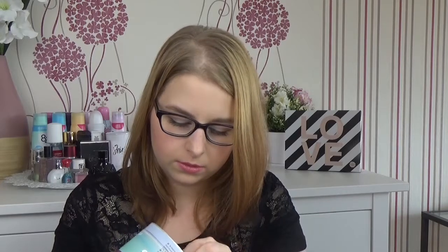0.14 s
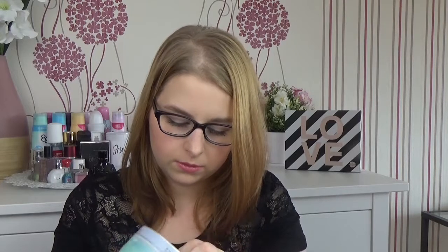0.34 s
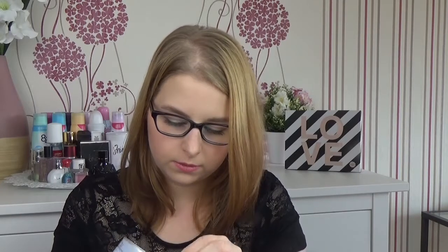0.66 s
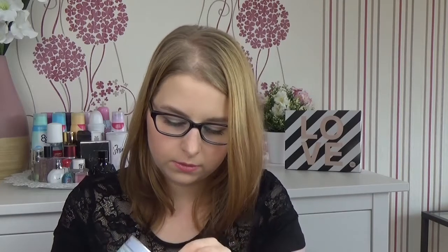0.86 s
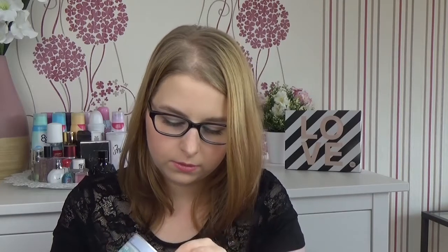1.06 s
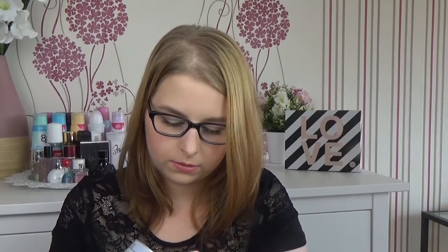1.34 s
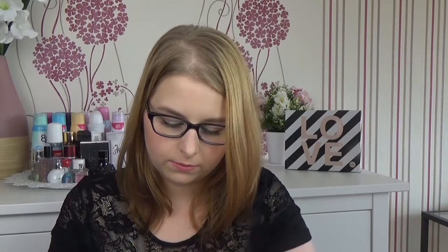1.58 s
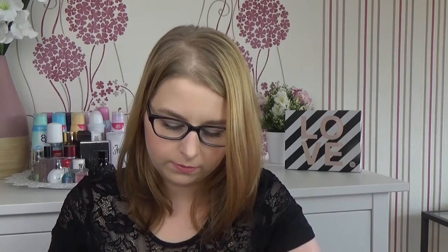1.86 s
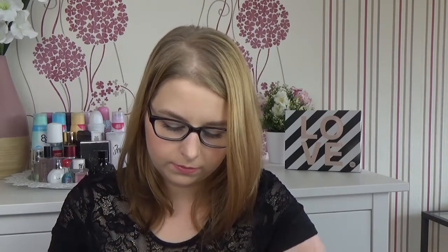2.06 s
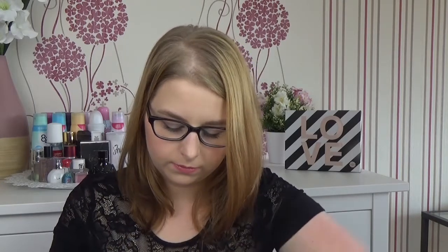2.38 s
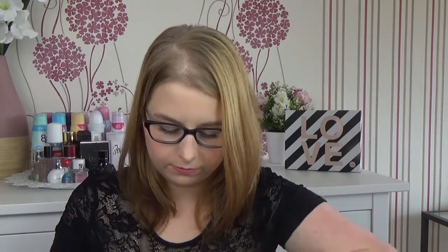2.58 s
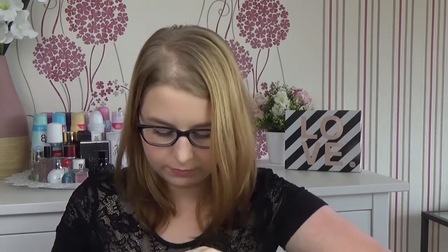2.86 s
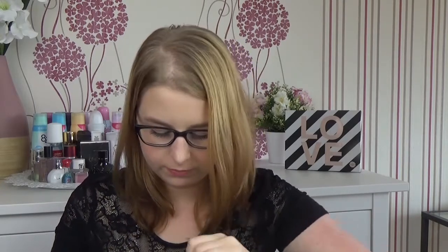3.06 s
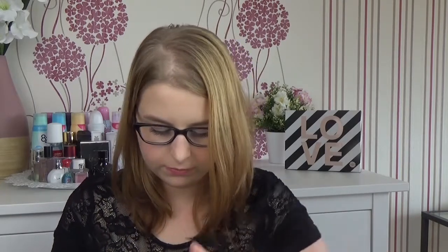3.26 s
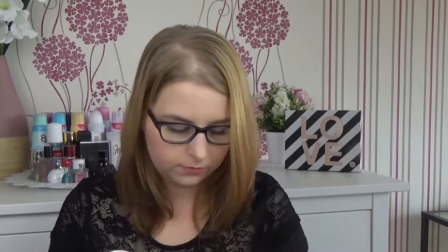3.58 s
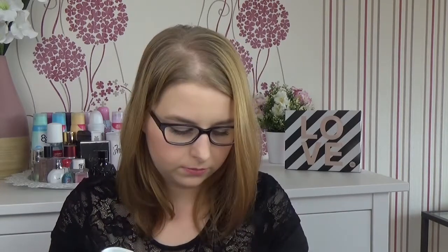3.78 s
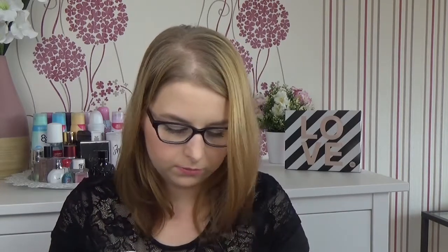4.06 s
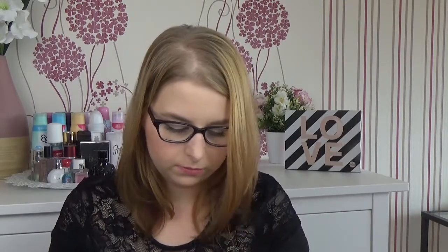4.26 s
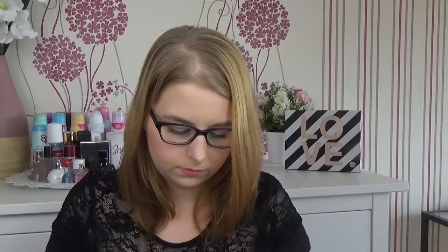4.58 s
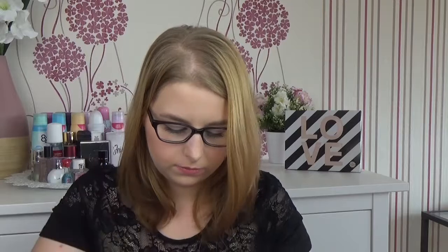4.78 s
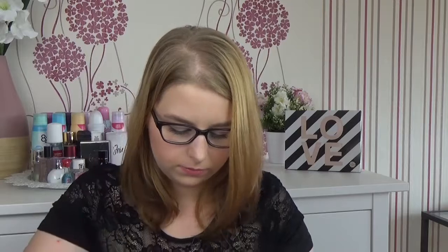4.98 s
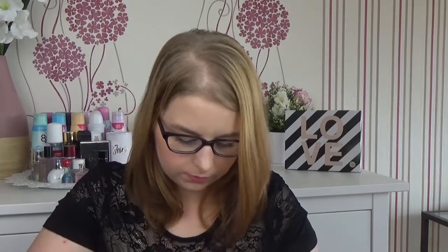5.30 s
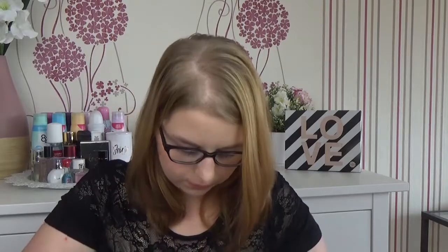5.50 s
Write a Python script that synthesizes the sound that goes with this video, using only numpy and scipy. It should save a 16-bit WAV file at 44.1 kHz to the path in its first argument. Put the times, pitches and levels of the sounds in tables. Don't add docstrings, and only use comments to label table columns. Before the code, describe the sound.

Hands handle a hollow cardboard can: a burst of loud clicks with a brief tearing scrape, a lull with faint finger rubs, scattered knocks, then a harder cluster of snaps and ripping. Another lull leads to light foil crackle, crisp rustling and last pops. Short room reverberation, soft air noise and low rumble, nearby stereo camera microphone.

```python
import sys
import numpy as np
from scipy import signal
from scipy.fft import rfft, irfft, next_fast_len
from scipy.io import wavfile

SR = 44100
rng = np.random.default_rng(int(sys.argv[2]) if len(sys.argv) > 2 else 0)


def attenuation_scalar(level_db):
    decades = np.asarray(level_db, float) / 20
    return 10 ** decades


def master_out(mix):
    frames = np.transpose(np.atleast_2d(mix))
    ceiling = np.clip(frames, -1, 1)
    pcm = np.round(ceiling * 32767).astype(np.int16)
    wavfile.write(sys.argv[1], SR, pcm)


N = 248283

# frequency_hz, density_db
AIR_SPECTRUM = [(15, -74), (25, -20.5), (185, -6), (695, -4), (887, -4.5), (1070, -4), (2910, -9.5),
                (16000, -16.5)]
# frequency_hz, side_minus_mid_db
AIR_SPREAD = [(60, -4), (200, -13), (380, -1.5), (700, -1.5), (1290, -0.5), (4400, -4.5), (8120, -9),
              (15000, -12)]
AIR_DB = -59
HUM_HZ, HUM_DB = 899, -76
RUMBLE_DB, BOOM_DB, BOOM_LAG_S = -76, -37.5, 0.031

# centre_hz, width_hz, level_db (over the plain sound)
TUBE_MODES = [
    [(506, 70, 7), (830, 67, -0.5), (1496, 140, 12), (1973, 100, 6.5), (2873, 300, 5.5), (3330, 220, 3),
     (4500, 930, 2.5)],
    [(530, 98, -6), (820, 29, -25.5), (950, 106, -3), (1280, 90, 4.5), (1530, 110, 2), (1990, 103, -17),
     (3340, 440, -9)],
    [(402, 103, 7), (607, 134, 8), (945, 136, 14.5), (1730, 180, -4.5), (2450, 230, -5), (2850, 190, -0.5),
     (3340, 87, -4)],
]
TUBE_CHANGES = [1.5, 4.82]

# start_s, energy_db, thud_db (re energy), thud_hz, ring_hz
BRIGHT_KNOCKS = [(0.001, -13.5, -2, 916, 1710), (0.08, -16.5, -3, 890, 1570),
                 (0.3071, -9.5, -3.5, 840, 4160), (0.384, -7, -1, 870, 3100), (0.3947, -3.5, -6, 941, 3220),
                 (0.4058, 2.5, 0.5, 534, 1990), (1.446, -25, -5, 765, 2020), (1.5811, 0.5, -9, 950, 1424),
                 (1.5939, -11.5, 2.5, 766, 1560), (1.7501, 0.5, 1, 666, 2370), (1.9183, -1, -27, 600, 1290),
                 (2.5213, -12, -2.5, 880, 3340), (2.5965, 7, -13, 900, 1670),
                 (2.7643, 6.5, -10.5, 750, 1280), (3.0211, -19, 5, 580, 3760),
                 (4.8957, -10.5, 3.5, 1050, 3580), (4.9119, -21, 8, 600, 3360),
                 (4.942, -13, -18, 920, 1820), (5.1391, -1.5, -8, 950, 2450)]
# start_s, energy_db, thud_db (re energy), thud_hz, ring_hz
DULL_KNOCKS = [(0.2485, -37, 7, 850, 1530), (1.0423, -36, 4, 553, 1550), (1.4171, -33.5, -15, 880, 2000),
               (1.6017, -8.5, -1, 830, 3630), (1.6843, -11.5, 1, 690, 1450), (1.892, -31, 14, 700, 1210),
               (1.907, -21, 15.5, 470, 2540), (1.9146, -3, 0, 560, 1940), (2.1944, -31.5, 2, 520, 1670),
               (2.4257, -3, -4, 1000, 1865), (2.5912, -8.5, -1, 844, 1940), (3.126, -27, -13, 550, 1350),
               (3.5246, -35, -1, 600, 1290), (4.8942, -21, 10, 686, 3540), (4.9035, 3.5, -10, 663, 3730),
               (4.969, -4.5, -6, 724, 1800), (5.4535, -15.5, -14, 480, 2340), (5.5039, 4.5, -15, 950, 1637),
               (5.5902, -10.5, -30, 960, 1390)]
BRIGHT_CRISP_DB, DULL_CRISP_DB = -7.5, -26.5
# start_s, energy_db, crisp_db (re energy), ring_hz
SEAL_CRACKS = [(0.089, -25, -6.5, 1570), (0.0979, -36, 10, 1400), (0.3369, -9, -0.5, 2030),
               (0.6665, -26, -5, 1510), (0.8845, -37, 0.5, 3260), (1.2254, -32.5, -10, 3220),
               (1.2989, -39, 3.5, 2080), (1.335, -37, -1, 1564), (1.6927, -30.5, 11, 2950),
               (1.7128, -5, -2, 2880), (1.8333, -16.5, 5, 2840), (2.2745, -28, -5, 1280),
               (2.373, -31.5, -2.5, 2750), (2.4896, -16, -6, 2060), (2.4947, -23.5, 0.5, 2240),
               (2.5328, -4.5, -12, 2040), (2.6234, -5, -1.5, 1630), (2.6636, 3, -10.5, 3070),
               (2.7086, 1.5, -19, 2360), (2.7421, -17, 8, 1870), (3.2766, -42, 3, 4530),
               (3.3769, -38, 2.5, 4500)]
# start_s, energy_db, crisp_db (re energy), ring_hz
FOIL_CRACKS = [(4.3802, -20.5, -15, 1900), (4.397, -48, 8, 1970), (4.4084, -16.5, -12, 1930),
               (4.4514, -26, -8, 3600), (4.474, -42, 9, 3180), (4.4812, -18, -17, 3130),
               (4.4963, -18.5, 3, 3200), (4.5006, -23, -22, 3230), (4.5186, -16.5, -21, 3750),
               (4.5328, -28, 8, 3570), (4.5579, -19, -12, 3870), (4.4215, -36, -12, 1880),
               (4.6086, -15, -10.5, 3200), (4.6293, -21, -22, 3140), (4.7639, -31, -8, 4070),
               (4.8088, -29, -6, 2740), (4.8323, -29, 11, 2580), (4.8399, -16, -2.5, 4370),
               (4.8508, -24.5, 10, 2800), (4.8629, -23, -12, 3890), (5.0491, -16.5, -5, 1990),
               (5.069, -12, -4.5, 4270), (5.1333, -7, -11.5, 4700), (5.1425, -9, -22, 3540)]
SEAL_THUD_DB, FOIL_THUD_DB, CRACK_THUD_HZ = -22.5, -22, 850

# centre_hz, t60_s, level_db, side_minus_mid_db
ROOM_BANDS = [(130, 0.24, -4, -5), (264, 0.27, 5, -14.5), (480, 0.44, -0.5, -13.5), (1040, 0.38, 1.5, -10),
              (2650, 0.47, -1, -8), (5600, .4, -1.5, -7.5), (12000, 0.26, -4, -11.5)]
# delay_ms, level_db, left_minus_right_db
ECHOES = [(2.6, -9.5, 9.5), (7.0, -13.5, -5.5), (12.5, -18.5, 6)]

# start_s, length_s, rasp_db, hollow_db (re rasp), crisp_db (re rasp)
RIPS = [
    [(0.407, .14, -19.5, 4.5, -8.5), (0.52, 0.091, -34.5, 4, -2.5)],
    [(2.766, 0.048, -17, -30.5, -3.5), (2.78, 0.18, -22, 2, 2), (2.825, 0.1, -25.5, 4.5, -16.5),
     (3.005, 0.083, -38.5, 2.5, -5.5)],
]
# start_s, length_s, rasp_db, hollow_db (re rasp), crisp_db (re rasp)
RUBS = [
    [(1.04, 0.25, -52.5, -1, -4), (1.41, .07, -57, 2, 5), (1.49, 0.2, -56.5, -1, 4)],
    [(2.1, .25, -53.5, -3, -4), (2.33, .055, -43.5, -28, 0.5), (2.36, 0.043, -51.5, 10.5, 5.5),
     (2.39, .045, -41, -8, 2)],
    [(3.25, 0.074, -56, -5, 6), (3.3, 0.091, -54.5, -3, -8), (3.36, 0.077, -50, -12, 2.5),
     (3.48, 0.12, -61.5, 8.5, -5)],
    [(4.229, 0.03, -35.5, -8.5, 1), (4.26, 0.13, -44.5, -24, 3.5)],
    [(4.318, 0.049, -41.5, -4.5, 8), (4.33, 0.2, -40.5, -18.5, 5.5), (4.448, 0.024, -29, -30, -15)],
    [(5.15, .25, -38, -13, 8.4), (5.4, 0.059, -41.5, -28, 2.3)],
]
# start_s, length_s, rasp_db, hollow_db (re rasp), crisp_db (re rasp)
CRINKLES = [
    [(4.47, 0.25, -48, -11, -19)],
    [(4.83, 0.32, -40.5, -22, -3), (4.9, 0.13, -36, -4.5, -9), (4.99, 0.3, -48.5, -19, -7)],
    [(5.44, 0.078, -42, -14, -5), (5.5, .125, -29, -15, -28)],
]
# hollow_hz, hollow_width_hz, rasp_hz, rasp_width_hz, crisp_hz
RIP_COLOUR = [(537, 460, 1650, 2800, 7400), (560, 258, 1800, 4000, 10300)]
RUB_COLOUR = [(797, 440, 2500, 2900, 9800), (600, 420, 2800, 3800, 9900), (600, 1100, 3400, 6400, 10800),
              (500, 36, 3500, 11000, 10800), (505, 190, 3560, 5300, 10600), (950, 850, 5340, 5300, 11160)]
CRINKLE_COLOUR = [(690, 630, 5800, 2800, 7900), (676, 980, 2070, 2500, 9700), (664, 620, 1570, 2900, 9100)]
# peak_share (of length), end_loss_db, crisp_db_per_db, release_abruptness (exponent)
RIP_PULL = (0.02, 20.6, 1.7, 1.49)
RUB_PULL = (0.49, 10, 2.3, 2.5)
CRINKLE_PULL = (0.33, 15, 1, 0.63)


def on_log(hz, table_hz, values):
    return np.interp(np.log(np.maximum(hz, 1)), np.log(table_hz), values)


def unit(x):
    return x / np.sqrt(np.mean(np.abs(x) ** 2, axis=-1, keepdims=True))


def hump(hz, centre_hz, width):
    return 1 / (1 + 1j * (hz ** 2 - centre_hz ** 2) / (np.maximum(hz, 1) * width))


def dull(hz, corner_hz):
    return 1 / (1 + 1j * hz / corner_hz) ** 3


def coloured_noise(gain):
    return irfft(rfft(rng.standard_normal(N)) * gain, N)


def murmur(hz):
    colour = attenuation_scalar(on_log(hz, *np.transpose(AIR_SPECTRUM)))
    mid = coloured_noise(colour)
    side = coloured_noise(colour * attenuation_scalar(on_log(hz, *np.transpose(AIR_SPREAD))))
    gain = attenuation_scalar(AIR_DB) / np.sqrt(np.mean(mid ** 2))
    return gain * (mid + side * np.array([[1], [-1]]))


def motor_line(hz):
    return attenuation_scalar(HUM_DB) * unit(coloured_noise(hump(hz, HUM_HZ, 4.1)))


def rumble(hz, can):
    low, wide = unit(irfft(rfft(rng.standard_normal((2, N))) * hump(hz, 200, 70) ** 2, N))
    noise = low + attenuation_scalar(-14) * wide * np.array([[1], [-1]])
    keep = np.exp(-1 / (BOOM_LAG_S * SR))
    smoother = [[(1 - keep) ** 2, 0, 0, 1, -2 * keep, keep ** 2]]
    shake = np.sqrt(np.abs(signal.sosfilt(smoother, can ** 2)))
    return (attenuation_scalar(RUMBLE_DB) + attenuation_scalar(BOOM_DB) * shake) * noise


def air(can):
    hz = np.fft.rfftfreq(N, 1 / SR)
    return murmur(hz) + motor_line(hz) + rumble(hz, can)


def tube(hz, s):
    stages = []
    for modes in TUBE_MODES:
        stages.append(1 + sum(attenuation_scalar(db) * hump(hz, centre_hz, width) for centre_hz, width, db in modes))
    return np.array(stages)[np.searchsorted(TUBE_CHANGES, np.ravel(s))]


def snap_rows():
    rows = []
    for table, crisp_db in ((BRIGHT_KNOCKS, BRIGHT_CRISP_DB), (DULL_KNOCKS, DULL_CRISP_DB)):
        rows += [(s, db, thud_db, crisp_db, thud_hz, ring_hz) for s, db, thud_db, thud_hz, ring_hz in table]
    for table, thud_db in ((SEAL_CRACKS, SEAL_THUD_DB), (FOIL_CRACKS, FOIL_THUD_DB)):
        rows += [(s, db, thud_db, crisp_db, CRACK_THUD_HZ, ring_hz) for s, db, crisp_db, ring_hz in table]
    return np.array(sorted(rows))


def snaps(contact_ms=1.846, thud_q=1.34, ring_q=2.8, ring_db=-0.5, overtone=2.15, overtone_db=-3):
    size = 2048
    s, db, thud_db, crisp_db, thud_hz, ring_hz = snap_rows().T[:, :, None]
    t, hz = np.arange(size) / SR, np.fft.rfftfreq(size, 1 / SR)
    contact = t * np.exp(-t * 1000 / contact_ms)
    burst = rng.standard_normal((len(s), 2, size))
    for _ in range(3):
        burst = irfft(np.exp(1j * np.angle(rfft(burst * contact))), size)
    body, crack = np.moveaxis(rfft(unit(burst * np.sqrt(contact))), 1, 0)

    panel = hump(hz, np.sqrt(2300 * ring_hz), 3400) ** 2
    panel = panel + attenuation_scalar(ring_db) * hump(hz, ring_hz, ring_hz / ring_q) ** 2
    panel = panel + attenuation_scalar(overtone_db) * hump(hz, overtone * ring_hz, ring_hz / ring_q) ** 2
    rasp = unit(panel * dull(hz, 9600) * tube(hz, s))
    thud = attenuation_scalar(thud_db) * unit(hump(hz, thud_hz, thud_hz / thud_q) ** 2 * tube(hz, s))
    crisp = attenuation_scalar(crisp_db) * unit(hump(hz, 10000, 9000) ** 2 * dull(hz, 16000))
    spectrum = body * (rasp + thud) + crack * crisp
    bursts = attenuation_scalar(db) * irfft(spectrum, size) / np.sqrt(size)

    out = np.zeros(N + size)
    np.add.at(out, (s * SR).astype(int) + np.arange(size), bursts)
    return out[:N]


def room_responses(count, size, build_s=0.00029, rim_ms=0.665, rim_db=-6):
    t, hz = np.arange(size) / SR, np.fft.rfftfreq(size, 1 / SR)
    centres = np.array(ROOM_BANDS)[:, 0]
    response = np.zeros((count, 2, size))
    for k, (_, t60, db, side_db) in enumerate(ROOM_BANDS):
        weight = on_log(hz, centres, np.arange(len(ROOM_BANDS)) == k)
        mid, side = irfft(rfft(rng.standard_normal((2, count, 1, size))) * np.sqrt(weight), size)
        build = 1 - np.exp(-(t / build_s) ** 2)
        fade = attenuation_scalar(-60 * t / t60) * build / np.sqrt(t60 * SR / 13.2)
        response += attenuation_scalar(db) * fade * (mid + attenuation_scalar(side_db) * side * np.array([[1], [-1]]))

    echoes = np.zeros((2, size))
    for ms, db, pan_db in ECHOES:
        echoes[:, int(ms * SR / 1000)] = attenuation_scalar(db + np.array([pan_db, -pan_db]) / 2)
    response += irfft(rfft(echoes) * dull(hz, 20000), size)
    response[..., 0] += 1
    rim_delay = np.exp(-2j * np.pi * hz * rim_ms / 1000)
    response -= attenuation_scalar(rim_db) * irfft(rim_delay * dull(hz, 7400), size)
    return response


def room(x, shift_s=0.3):
    size, step = int(0.8 * SR), int(shift_s * SR)
    starts = np.arange(0, N, step)
    out = np.zeros((2, N + step + size))
    for i, ring in zip(starts, room_responses(len(starts), size)):
        heard = signal.fftconvolve(x[None, i:i + step], ring, axes=1)
        out[:, i:i + heard.shape[1]] += heard
    return out[:, :N]


def friction(groups, colours, pull, per_second, scatter_db, smooth):
    slips = (rng.random(N) < per_second / SR) * attenuation_scalar(scatter_db * rng.exponential(size=N))
    roughness = unit(signal.lfilter([1], [1, -0.95], slips)) + smooth
    grain = roughness * rng.standard_normal((3, N))
    peak_share, lost_db, crisp_law, abrupt = pull
    out = np.zeros(N)
    for strokes, colour in zip(groups, colours):
        hollow_hz, hollow_width, rasp_hz, rasp_width, crisp_hz = colour
        for s, length, db, hollow_db, crisp_db in strokes:
            i = np.arange(int(s * SR), int((s + length) * SR))
            t, size = i / SR - s, next_fast_len(len(i))
            hz = np.fft.rfftfreq(size, 1 / SR)
            shapes = np.array([hump(hz, rasp_hz, rasp_width),
                               hump(hz, hollow_hz, hollow_width),
                               hump(hz, crisp_hz, 6000)])
            spectrum = rfft(grain[:, i], size) * shapes ** 2 * tube(hz, s)
            layers = unit(irfft(spectrum, size)[:, :len(i)])
            slack_db = lost_db * np.abs((t / length - peak_share) / (1 - peak_share)) ** abrupt
            levels = attenuation_scalar(db + np.array([-slack_db,
                                        hollow_db - slack_db,
                                        crisp_db - crisp_law * slack_db]))
            touch = np.clip(np.minimum(t / 0.0045, (length - t) / 0.027), 0, 1)
            out[i] += touch * np.sum(levels * layers, axis=0)
    return out


def rips():
    return friction(RIPS, RIP_COLOUR, RIP_PULL, 900, scatter_db=1.5, smooth=0.5)


def rubs():
    return friction(RUBS, RUB_COLOUR, RUB_PULL, 490, scatter_db=1.0, smooth=1.8)


def crinkles():
    return friction(CRINKLES, CRINKLE_COLOUR, CRINKLE_PULL, 300, scatter_db=7.0, smooth=0.54)


def scene():
    can = attenuation_scalar(2.0) * snaps() + attenuation_scalar(-3.5) * rips() + attenuation_scalar(-11.0) * rubs() + attenuation_scalar(-3.5) * crinkles()
    return room(can) + air(can)


def roll_off(x):
    return signal.sosfilt(signal.butter(12, 16470, fs=SR, output="sos"), x)


def record(dry):
    mid, side = (dry[0] + dry[1]) / 2, (dry[0] - dry[1]) / 2
    side = signal.sosfilt(signal.butter(2, 8500, fs=SR, output="sos"), side)
    both = [mid + side, mid - side]
    both = signal.sosfilt(signal.butter(2, 60, "highpass", fs=SR, output="sos"), both)
    both = np.tanh(1.3 * both) / 1.3
    both = signal.sosfilt(signal.ellip(8, 0.2, 70, 15700, fs=SR, output="sos"), both)
    return roll_off(both)


dry = scene()
out = record(dry)
master_out(out)
```